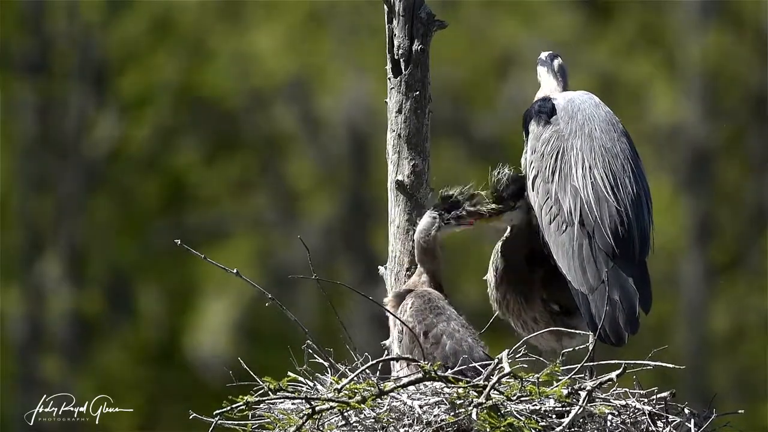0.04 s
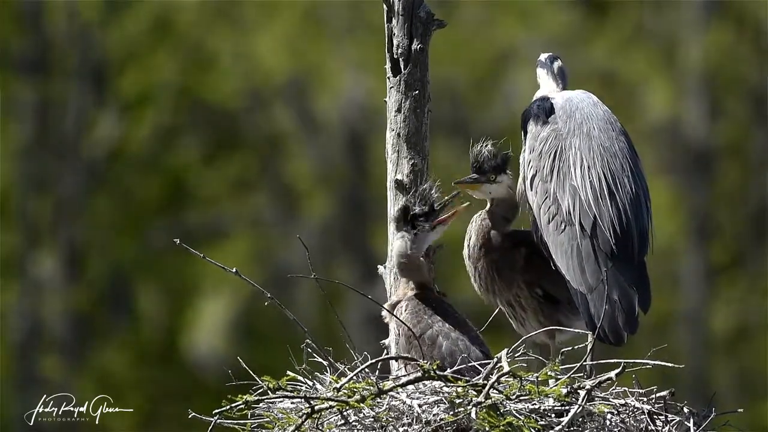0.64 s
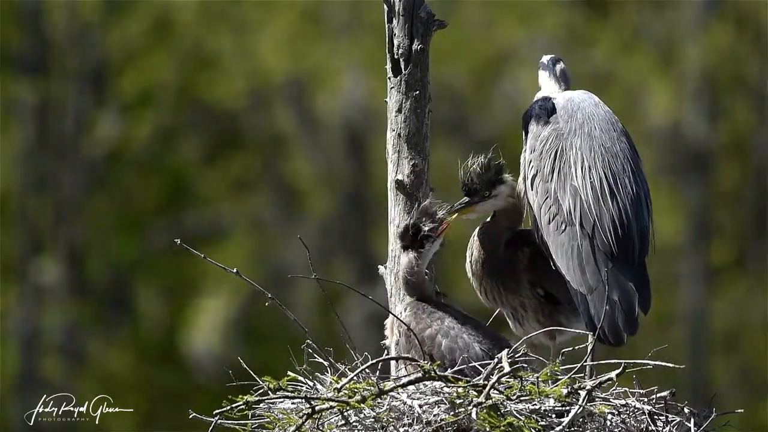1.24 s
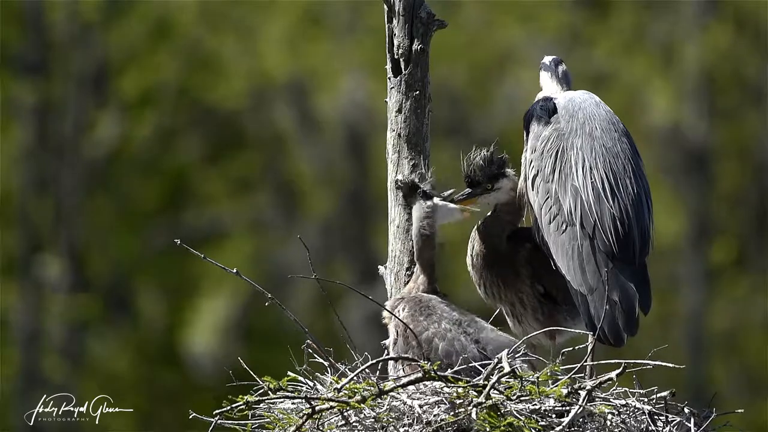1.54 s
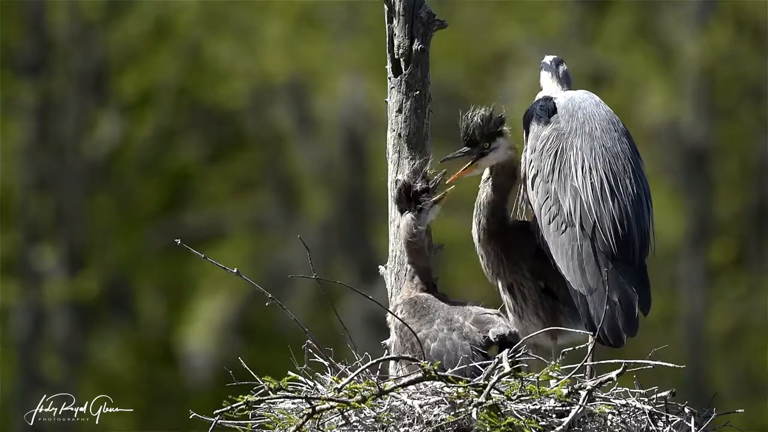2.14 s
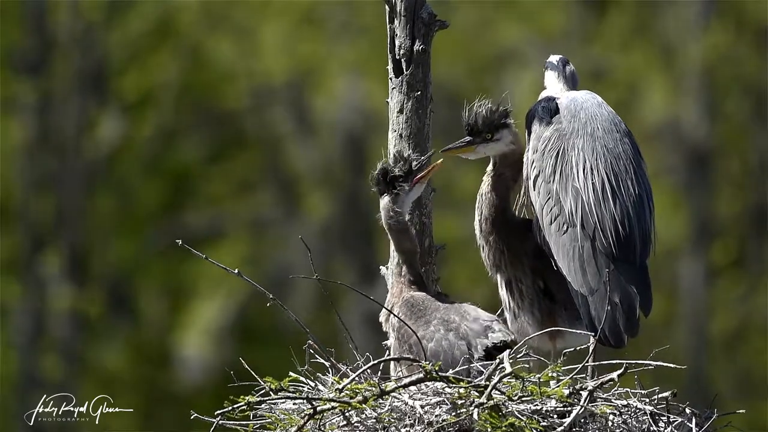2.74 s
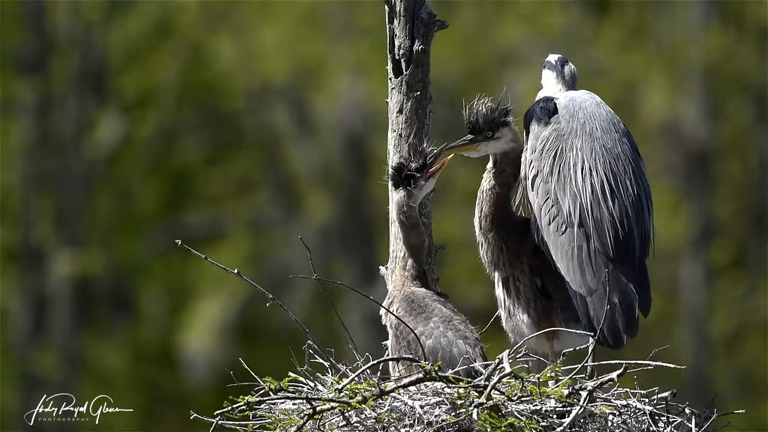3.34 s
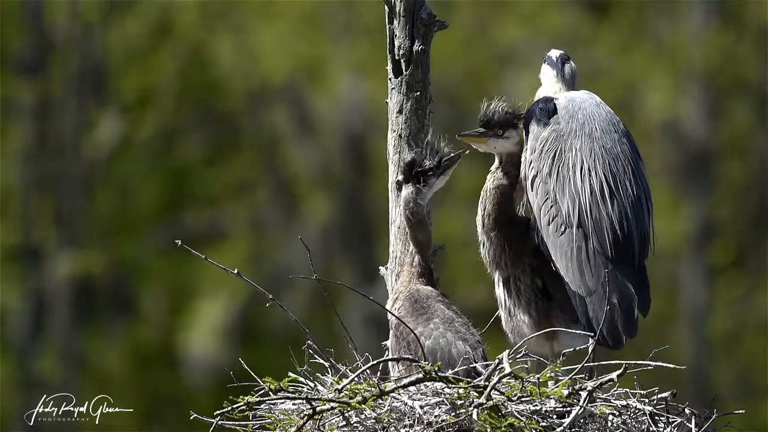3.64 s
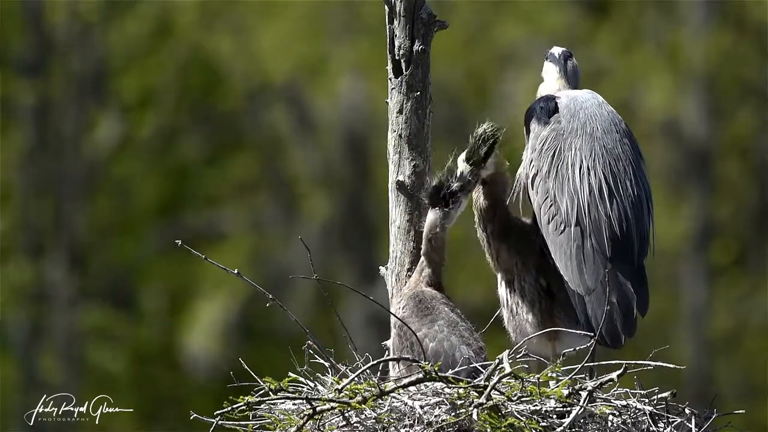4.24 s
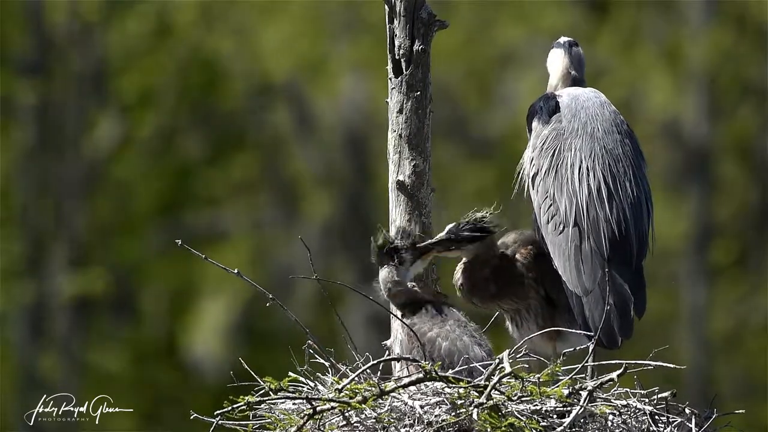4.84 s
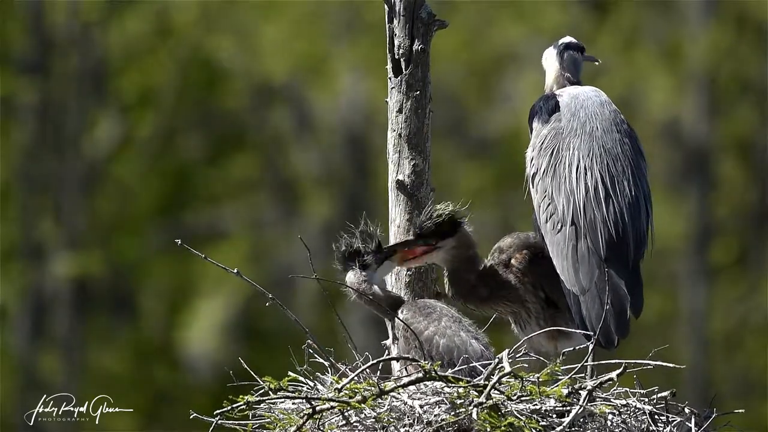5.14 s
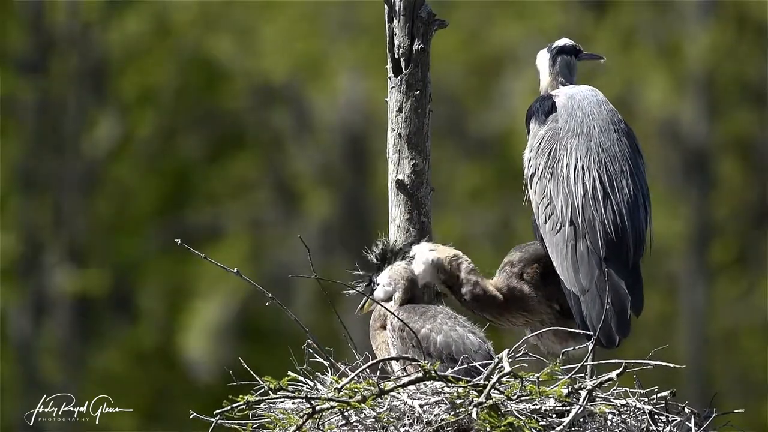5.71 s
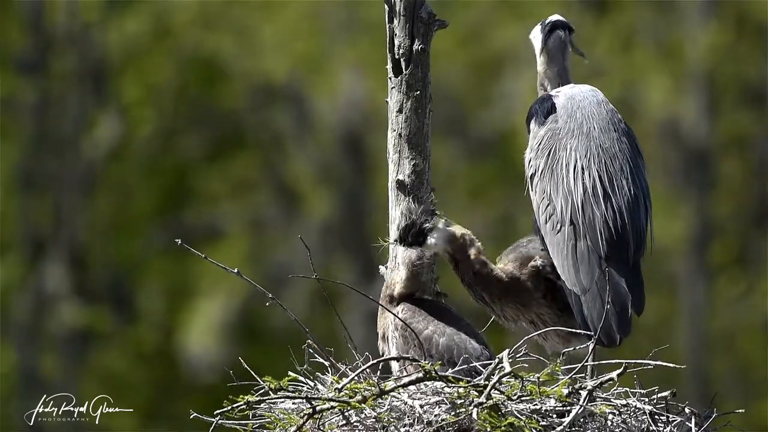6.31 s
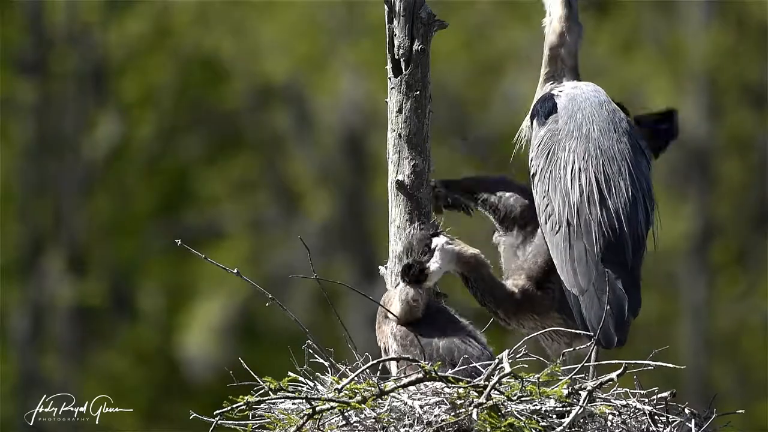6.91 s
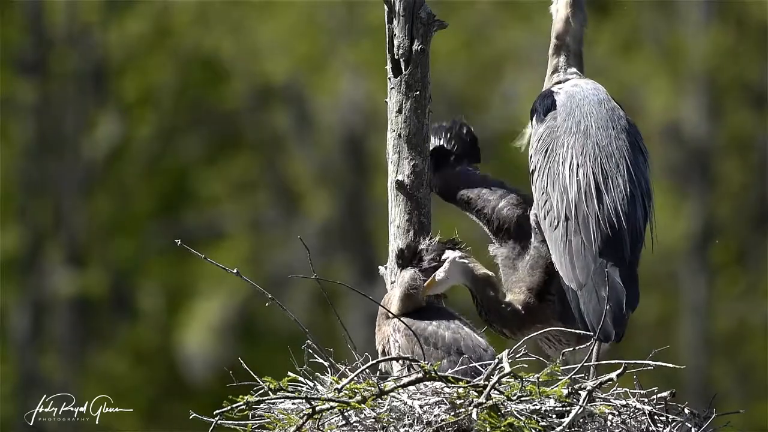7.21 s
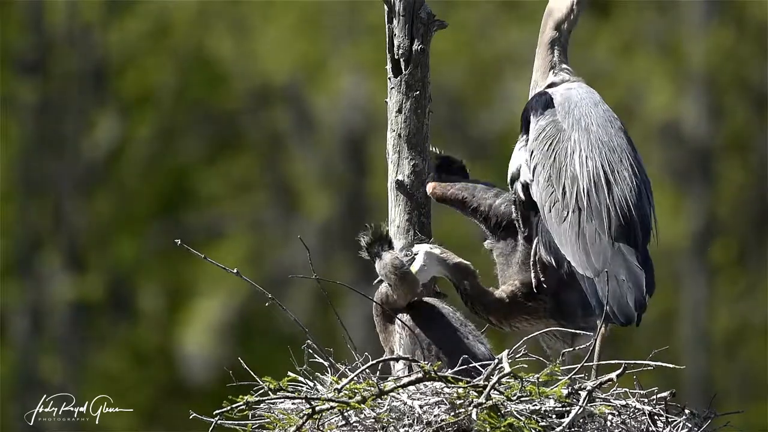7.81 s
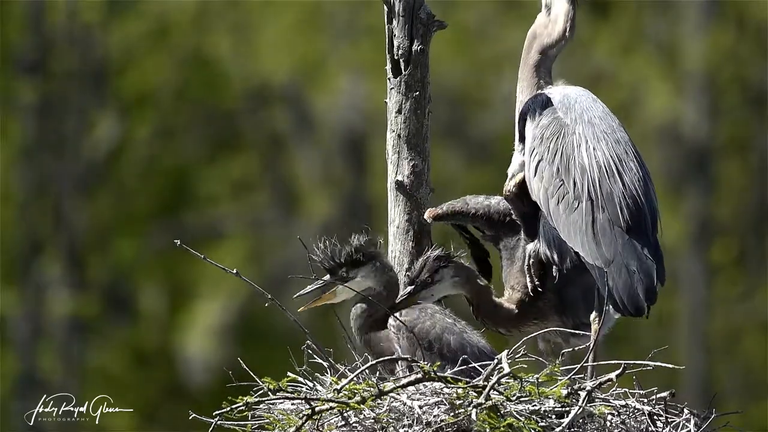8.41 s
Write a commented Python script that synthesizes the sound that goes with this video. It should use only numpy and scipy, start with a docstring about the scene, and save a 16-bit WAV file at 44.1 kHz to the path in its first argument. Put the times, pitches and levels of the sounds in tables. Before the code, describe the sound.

Wind buffets the microphone throughout with a low, uneven rumble and soft thumps, stronger on the left and louder than the birds. From about 0.5 to 3.5 seconds, heron chicks beg with short, dry, rattling clacks, about four a second, echoing slightly among trees. A few faint distant whistles and a rasp come around 1 second. Between 4 and 5 seconds there are several light bill clicks, while a far songbird sings a quick phrase of sliding notes until about 5.3 seconds. Two more clacks and a brief rasp follow by 5.5 seconds. The wind eases from 5 to 6.5 seconds, and two very faint, distant honks sound just after 6. From about 7 seconds the gusts return, leaves hiss softly, and the chicks resume their regular clacking until the end, near 8.7 seconds. A faint background rumble lies underneath.

```python
"""Heron chicks on a windy day

Two heron chicks beg in a treetop nest and knock their bills. Each dry 'kek' is a quick
rattle of slaps in the voice box that sets the throat ringing. Wind buffets the two
microphones, and a breeze swells in the leaves. Far off a songbird sings sliding notes
and other birds rasp and honk; the recorder's electronics whine thinly."""
import sys
import numpy as np
from scipy import signal
from scipy.fft import rfft, irfft
from scipy.io import wavfile
from scipy.ndimage import uniform_filter1d

SR = 44100
rng = np.random.default_rng(int(sys.argv[2]) if len(sys.argv) > 2 else 0)


def output_pcm(signal):
    """Save a mono or channel-first signal as 16-bit PCM at the path in sys.argv[1].

    Samples are clipped to [-1, 1] before scaling.
    """
    pcm = np.clip(np.atleast_2d(signal).T, -1, 1) * 32767
    wavfile.write(sys.argv[1], SR, np.round(pcm).astype(np.int16))


N = 381906
TIME = np.arange(N) / SR


def gain_of(db):
    """Turns decibels into a number to multiply a sound by."""
    return 10 ** (np.asarray(db) / 20)


def unit_level(x):
    """Scales a signal so that its average power is 1."""
    return x / np.sqrt(np.mean(x ** 2) + 1e-20)


def curve(rows):
    """Joins (time_s, value) points with straight lines, giving one value per sample."""
    return np.interp(TIME, *np.transpose(rows))


def add(mix, start_s, sound):
    """Mixes a sound in at the given time."""
    part = mix[max(round(start_s * SR), 0):][:len(sound)]
    part += sound[:len(part)]


def panned(left_db):
    """Left and right gains that make the left side louder by left_db."""
    ratio = gain_of(np.atleast_1d(left_db))
    return np.array([ratio, np.ones_like(ratio)]) * np.sqrt(2 / (1 + ratio ** 2))


def noise(spectrum):
    """Two unrelated channels of noise with the given balance of low and high pitches."""
    hz, db = np.transpose(spectrum)
    colour = gain_of(np.interp(np.log(np.fft.rfftfreq(N, 1 / SR) + 1), np.log(hz), db))
    return unit_level(irfft(rfft(rng.standard_normal((2, N))) * colour, N))


def drift(hz):
    """A smooth random wobble; a higher hz makes it quicker."""
    keep_slow = np.exp(-(np.fft.rfftfreq(N, 1 / SR) / hz) ** 2)
    return unit_level(irfft(rfft(rng.standard_normal(N)) * keep_slow, N))


def band(x, low_hz, high_hz, order=2):
    """Keeps the part of a sound between two pitches."""
    edges_hz = [low_hz, min(high_hz, SR / 2 - 1)]
    return signal.sosfilt(signal.butter(order, edges_hz, "band", fs=SR, output="sos"), x)


def ring(x, hz, width_hz, soft_start=False):
    """Makes a sound ring at one pitch; a smaller width rings for longer."""
    t = np.arange(SR // 25) / SR
    response = np.exp(-np.pi * width_hz * t) * np.sin(2 * np.pi * hz * t)
    if soft_start:
        response *= t
    return unit_level(signal.fftconvolve(x, response)[:len(x)])


def woods(x, echo_db, fade_s, left_db):
    """Tree trunks scatter a thin echo to each side; it falls 60 dB in fade_s."""
    t = np.arange(SR) / SR
    bounces = rng.standard_normal((2, SR)) * (rng.random((2, SR)) < .1)
    bounces *= gain_of(-60 * t / fade_s)
    echo = signal.fftconvolve(x[None], bounces / np.linalg.norm(bounces[0]), axes=1)[:, :N]
    return panned(left_db) * (x + gain_of(echo_db) * echo)


# The tones of the whine: pitch_hz, left_db, right_db
WHINE_TONES = [(8253, -82, -89), (11746, -83, -90), (11806, -79, -88), (11962, -72, -77), (15735, -84, -71),
               (15747, -90, -79)]
def whine(wobble_hz=3):
    """The electronics give off thin, slightly unsteady tones."""
    out = np.zeros((2, N))
    for pitch_hz, left_db, right_db in WHINE_TONES:
        cycles = np.cumsum(pitch_hz + wobble_hz * drift(hz=15)) / SR
        out += gain_of([[left_db], [right_db]]) * unit_level(np.sin(2 * np.pi * cycles))
    return out


# The tone of the far rumble: pitch_hz, strength_db
RUMBLE_TONE = [(20, 3.5), (150, 8), (420, 1), (580, -3.5), (720, -6), (950, -10), (1300, -12.5),
               (2000, -16.5), (3500, -26), (8000, -34.5)]
# How that rumble swells: time_s, level_db
RUMBLE_SWELL = [(0, -48), (2.4, -46.5), (3.3, -48), (4.2, -47), (5.3, -46), (5.7, -46.5), (6.3, -46.5),
                (6.8, -47), (8, -47.5), (8.66, -46.5)]
# The tone of the hissing leaves: pitch_hz, strength_db
LEAF_TONE = [(500, 11.5), (2500, -2), (4300, 3), (6200, 0.5), (8000, 2.5), (10000, -1), (12000, -6),
             (13500, -8.5), (16000, -33)]
# How the breeze swells in them: time_s, level_db
LEAF_SWELL = [(0, -55.5), (1.5, -56), (3, -57), (4.3, -56.5), (5.9, -55.5), (6.4, -54), (6.85, -51),
              (7.4, -52), (8.1, -51), (8.66, -53)]
def countryside(crossfeed=0.059, flutter_db=0.64):
    """The land rumbles far away while a breeze makes the leaves hiss."""
    rumble, leaves = noise(RUMBLE_TONE), noise(LEAF_TONE)
    rumble = unit_level(rumble + crossfeed * rumble[::-1])  # each side gets a little of the other
    rumble *= gain_of(curve(RUMBLE_SWELL) + 0.34 * drift(hz=11))
    leaves *= gain_of(curve(LEAF_SWELL) + flutter_db * drift(hz=25))
    return rumble * panned(left_db=4) + leaves * panned(left_db=4.5)


def hoarse_calls(calls, throat):
    """Bursts of breath ring a bird's throat; pitch_factor shifts all its pitches together."""
    out = np.zeros(N)
    for start_s, length_s, level_db, pitch_factor in calls:
        count = int(length_s * SR)
        breath = rng.standard_normal(count) * signal.windows.tukey(count, .5)
        breath = np.pad(breath, (0, count // 2))  # room to ring on
        voice = sum(gain_of(db) * ring(breath, hz * pitch_factor, width_hz, soft_start=True)
                    for hz, width_hz, db in throat)
        add(out, start_s, gain_of(level_db) * unit_level(voice))
    return out


# Harsh rasps and faint honks: start_s, length_s, level_db, pitch_factor
RASP_CALLS = [(.858, 0.042, -57.5, 0.97), (.90, 0.024, -61, 1.2), (4.29, 0.013, -61, 1.1),
              (5.338, 0.032, -53.5, 0.98), (7.585, 0.015, -58.5, 0.93)]
HONK_CALLS = [(6.17, 0.23, -65, 0.99), (6.42, 0.14, -63.5, 1)]
# Where each kind of throat rings: pitch_hz, width_hz, strength_db
RASP_THROAT = [(2760, 330, 7), (3036, 400, 7.5), (3630, 450, 3.5), (7700, 2700, 2.5), (9200, 2600, -4.5)]
HONK_THROAT = [(630, 140, 3.5), (1440, 390, -2), (2050, 290, -1)]
def far_birds():
    """Birds rasp in other trees and honk from across the marsh."""
    rasps = woods(hoarse_calls(RASP_CALLS, RASP_THROAT), echo_db=3.5, fade_s=0.37, left_db=7)
    honks = woods(hoarse_calls(HONK_CALLS, HONK_THROAT), echo_db=5.0, fade_s=0.57, left_db=11)
    return rasps + honks


# The sliding notes of the song: start_s, length_s, from_hz, to_hz, level_db
SONG_NOTES = [(0.803, 0.14, 3630, 3340, -67), (1.02, .05, 3780, 4400, -68), (1.325, 0.087, 3450, 2680, -66),
              (4.126, 0.043, 4200, 5350, -67), (4.204, .045, 4240, 5300, -67),
              (4.365, 0.028, 3970, 3800, -70), (4.412, 0.035, 4080, 3750, -66),
              (4.477, 0.052, 3870, 5320, -64.5), (4.593, 0.1, 4460, 3220, -60),
              (4.748, 0.046, 3960, 5250, -59), (4.838, 0.028, 4350, 5350, -62),
              (4.91, 0.028, 4250, 5360, -59.5), (4.976, 0.03, 4100, 3750, -60),
              (5.035, 0.028, 4130, 3750, -57.5), (5.092, 0.053, 3780, 5350, -58),
              (5.209, 0.097, 4560, 3130, -58.5)]
def songbird(sag=0.41, quaver=0.021):
    """A far bird whistles quavering slides: rising ones get steeper, falling ones flatten out."""
    out = np.zeros(N)
    waver = 1 + quaver * drift(hz=250)
    for start_s, length_s, from_hz, to_hz, level_db in SONG_NOTES:
        progress = np.linspace(0, 1, int(length_s * SR))
        slide_hz = to_hz - from_hz
        pitch_hz = from_hz + slide_hz * progress - sag * abs(slide_hz) * progress * (1 - progress)
        cycles = np.cumsum(pitch_hz * waver[int(start_s * SR):][:len(progress)]) / SR
        note = np.sin(2 * np.pi * cycles) * signal.windows.tukey(len(progress), .35)
        add(out, start_s, gain_of(level_db) * unit_level(note))
    return woods(out, echo_db=-3.0, fade_s=0.62, left_db=2.0)


# Steady wind on each microphone (the left is sheltered for a while): time_s, level_db
STEADY_LEFT = [(0, -41), (.33, -42), (.55, -37.5), (.78, -33), (1.07, -27.5), (1.46, -35.5), (1.75, -24.5),
               (2.05, -37.5), (3.1, -35), (3.6, -34.5), (4.55, -37.5), (5.1, -48.5), (6.2, -44),
               (6.75, -39), (7.35, -25), (7.77, -32.5), (8.08, -28), (8.66, -32)]
STEADY_RIGHT = [(0, -39.5), (.7, -31), (1.05, -36.5), (1.8, -27.5), (2.4, -35.5), (2.8, -33), (3.1, -35.5),
                (3.95, -31.5), (4.33, -39.5), (5.3, -34), (5.7, -32.5), (6.4, -37.5), (7.1, -35),
                (7.45, -29), (7.95, -34), (8.66, -33)]
# Short gusts: peak_s, length_s, level_db, side (0 left, 1 right)
WIND_GUSTS = [(0.413, 0.054, -26, 0), (0.623, 0.088, -23.5, 0), (0.869, 0.11, -28, 1),
              (1.102, 0.066, -25.5, 0), (1.3, 0.15, -26, 0), (1.612, .11, -21.5, 0), (2.144, .06, -27.5, 0),
              (2.328, 0.04, -26, 0), (2.493, 0.086, -27, 0), (2.853, 0.11, -30, 0), (3.21, 0.04, -28, 0),
              (3.252, 0.041, -30, 1), (3.34, 0.037, -30.5, 1), (3.426, .06, -29, 0),
              (3.647, 0.085, -23.5, 0), (3.783, 0.039, -29, 1), (3.907, 0.055, -26.5, 0),
              (3.992, 0.061, -31.5, 0), (4.306, 0.13, -30.5, 0), (4.472, 0.12, -28.5, 1),
              (4.643, 0.045, -30, 0), (6.36, 0.073, -33, 0), (6.918, 0.053, -24, 0), (7.248, 0.073, -22, 0),
              (7.59, 0.16, -24.5, 0), (8.377, 0.079, -23.5, 0), (8.577, 0.081, -25.5, 0)]
def wind_level(side, rise_share=0.34):
    """Wind level in dB on one side: gusts build fast and ebb slowly on top of the steady wind."""
    power = gain_of(curve((STEADY_LEFT, STEADY_RIGHT)[side])) ** 2
    for peak_s, length_s, level_db, gust_side in WIND_GUSTS:
        if gust_side == side:
            t = np.arange(-2 * length_s, 2 * length_s, 1 / SR)
            slope_s = length_s * np.where(t < 0, rise_share, 1 - rise_share)
            swell = np.exp(-(t / slope_s) ** 2)
            add(power, peak_s + t[0], gain_of(level_db) ** 2 * swell)
    return 10 * np.log10(power)


# The tone of wind on a microphone: pitch_hz, strength_db
WIND_TONE = [(12, -39), (28, -17.5), (50, -1), (85, 1.5), (125, -1), (200, -9.5), (300, -17), (450, -36),
             (700, -57), (1500, -73), (4000, -100)]
def wind(usual_left_db=-26, usual_right_db=-33, bend_hz=80, stretch_per_db=0.0313, steadiness=0.88):
    """Air swirls at each microphone; harder gusts add smaller swirls, so the rumble reaches higher."""
    level_db = np.array([wind_level(side) + 1.61 * drift(hz=20) for side in (0, 1)])
    hz, slice_s, slices = signal.stft(rng.standard_normal((2, N)), SR, nperseg=2048, noverlap=1536)
    slice_samples = np.minimum((slice_s * SR).astype(int), N - 1)
    extra_db = (level_db - [[usual_left_db], [usual_right_db]])[:, None, slice_samples]
    octaves = np.log2((hz[:, None] + 1) / bend_hz)
    # Only the pitches above bend_hz stretch with the wind.
    octaves = np.minimum(octaves, 0) + np.maximum(octaves, 0) * np.exp(-stretch_per_db * extra_db)
    tone_hz, tone_db = np.transpose(WIND_TONE)
    colour = gain_of(np.interp(octaves, np.log2(tone_hz / bend_hz), tone_db))
    rumble = signal.istft(slices * colour, SR, nperseg=2048, noverlap=1536)[1][:, :N]
    # Even out chance swells, so that the gusts set the loudness.
    local_power = uniform_filter1d(rumble ** 2, size=2200, axis=1) + 1e-20
    return gain_of(level_db) * unit_level(rumble / local_power ** (steadiness / 2))


# Single thumps of wind: middle_s, peak_db, pitch_hz, side (0 left, 1 right)
WIND_THUMPS = [(0.622, -22, 120, 0), (1.04, -15, 111, 0), (1.304, -16, 205, 0), (1.744, -12, 161, 0),
               (2.333, -16, 240, 0), (2.823, -15.5, 146, 0), (3.547, -13, 116, 0), (3.925, -22, 234, 1),
               (4.001, -22, 250, 0), (4.50, -21, 250, 1), (4.554, -17, 188, 1), (5.223, -17.5, 148, 1),
               (6.918, -20, 108, 0), (7.254, -13, 188, 0), (7.285, -14, 204, 0), (7.564, -13, 169, 0),
               (7.91, -16, 184, 0), (8.03, -15, 176, 0), (8.355, -17.5, 214, 0), (8.385, -17, 278, 0),
               (8.406, -13.5, 161, 0), (8.522, -20.5, 262, 0)]
def thumps(fade_cycles=0.38):
    """A swirl of air hits one microphone with a single pull and push."""
    out = np.zeros((2, N))
    t = np.arange(-SR // 20, SR // 20) / SR
    for middle_s, peak_db, pitch_hz, side in WIND_THUMPS:
        push = np.sin(2 * np.pi * pitch_hz * t) * np.exp(-np.hypot(pitch_hz * t, .15) / fade_cycles)
        add(out[side], middle_s + t[0], gain_of(peak_db) * push / push.max())
    return out


# Small knocks: start_s, level_db, pitch_hz, fade_s (time to fall 60 dB)
BILL_KNOCKS = [(3.961, -51, 10000, 0.029), (4.143, -59, 13000, .04), (4.571, -48, 4470, 0.058),
               (4.575, -56, 8750, .05), (4.903, -56, 2360, 0.071), (6.865, -57, 9000, .03)]
def knocks(spread=1.24):
    """Bills and twigs knock, each making a dry snap of noise that dies fast."""
    out = np.zeros(N)
    t = np.arange(SR // 10) / SR
    for start_s, level_db, pitch_hz, fade_s in BILL_KNOCKS:
        snap = unit_level(band(rng.standard_normal(len(t)), pitch_hz / spread, pitch_hz * spread))
        add(out, start_s, gain_of(level_db - 60 * t / fade_s) * snap)
    return woods(out, echo_db=-1, fade_s=0.27, left_db=3)


def rattle(length_s, slaps_per_s=155, jitter=.14, loudest_share=.27, puff_size=.33, puff_fade_s=.004):
    """The voice box makes a few uneven slaps, strongest early on; air puffs out after each."""
    t = np.arange(int(length_s * SR) + SR // 30) / SR
    gap_luck, size_luck = rng.standard_normal((2, 12))
    hiss = rng.standard_normal(SR // 5)[:len(t)]
    gaps_s = np.maximum(1 + jitter * gap_luck, .1) / slaps_per_s
    slaps = np.zeros(len(t))
    for slap_s, luck_db in zip(np.cumsum(gaps_s) - gaps_s[0], 2.4 * size_luck):
        if slap_s < length_s:
            drop_db = 24 * (slap_s / length_s - loudest_share) ** 2
            push = gain_of(luck_db - drop_db)
            puff = hiss * (t >= slap_s) * np.exp(-abs(t - slap_s) / puff_fade_s)
            slaps += push * puff_size * puff / np.linalg.norm(puff)
            add(slaps, slap_s, np.array([push]))
    return slaps


# Where a chick's throat rings, with the bill open narrowly or wide:
# narrow_hz, wide_hz, width_hz, narrow_db, wide_db
CHICK_THROAT = [(1030, 1288, 136, -1, -0.5), (1587, 1730, 96, 14.5, -15), (1723, 1794, 89, 0, 0.5),
                (2150, 2195, 84, -4, -0.5), (2760, 2810, 98, -25, -11), (3320, 3660, 630, -16, -20)]
def kek(opening, length_s, treble_db_per_octave):
    """One call: the rattle rings the throat, which is tuned by how far the bill opens."""
    slaps = rattle(length_s)
    voice = np.zeros(len(slaps))
    for narrow_hz, wide_hz, width_hz, narrow_db, wide_db in CHICK_THROAT:
        hz = narrow_hz + opening * (wide_hz - narrow_hz)
        db = narrow_db + opening * (wide_db - narrow_db) + treble_db_per_octave * np.log2(hz / 1000)
        voice += gain_of(db) * ring(slaps, hz, width_hz)  # each slap rings on into the next
    return unit_level(band(voice, low_hz=970, high_hz=3930, order=3))


# The begging calls: start_s, level_db, opening (0 narrow, 1 wide), length_s, treble_db_per_octave
BEGGING_CALLS = [(0.459, -57.5, 0.62, 0.029, -3), (0.716, -51.5, 0.61, 0.027, 2),
                 (0.989, -49, 0.76, 0.026, 0), (1.246, -46.5, 0.92, 0.032, 2),
                 (1.474, -53.5, 0.61, 0.039, 11), (1.728, -55, 0.83, 0.033, -1),
                 (1.973, -52.5, 0.66, 0.021, -20), (2.249, -49, 0.32, 0.032, 3),
                 (2.487, -50, 0.32, 0.043, 3), (2.719, -47.5, 0.15, 0.039, 5),
                 (2.957, -47, 0.15, 0.039, -5), (3.2, -47, 0.11, 0.039, -2), (3.449, -47.5, 0.16, 0.037, 5),
                 (5.184, -59.5, 0.74, 0.035, 8), (5.484, -51.5, 0.56, 0.019, -2),
                 (6.701, -64.5, 1, 0.044, 9), (7.088, -55.5, 0.99, 0.021, -7), (7.336, -51, 1, 0.026, 2),
                 (7.664, -55, 1, 0.029, -1), (7.944, -54, 0.89, 0.024, -5), (8.223, -52, 0.74, 0.024, -4),
                 (8.515, -45.5, 0.95, 0.028, -6)]
def chicks():
    """The chicks beg in runs of keks that echo briefly among the trees."""
    out = np.zeros(N)
    for start_s, level_db, *shape in BEGGING_CALLS:
        add(out, start_s, gain_of(level_db) * kek(*shape))
    return woods(out, echo_db=-5.5, fade_s=0.17, left_db=4.0)


def scene():
    """Birds, wind, countryside and whine, all heard together."""
    return chicks() + songbird() + far_birds() + knocks() + wind() + thumps() + countryside() + whine()


def record(dry):
    """The recorder cuts off the very highest treble."""
    treble_cut = signal.firwin(1023, cutoff=15900, window=("kaiser", 9), fs=SR)
    return signal.oaconvolve(dry, treble_cut[None], "same")


dry = scene()
out = record(dry)
output_pcm(out)
```